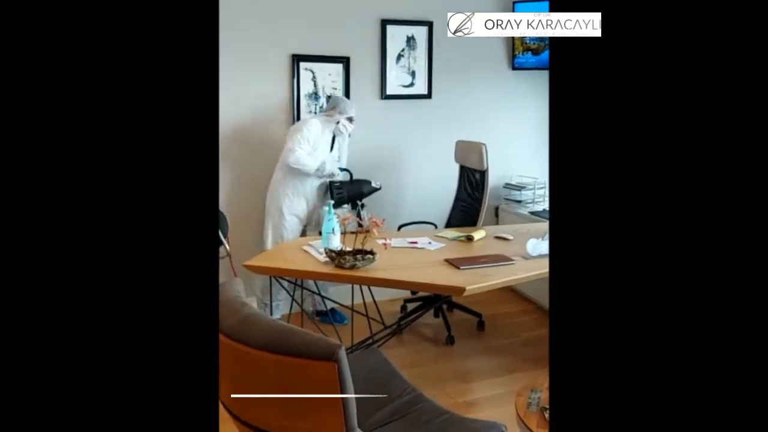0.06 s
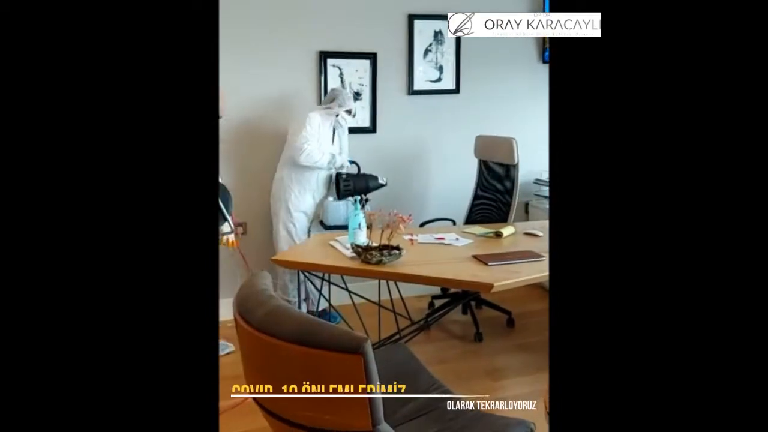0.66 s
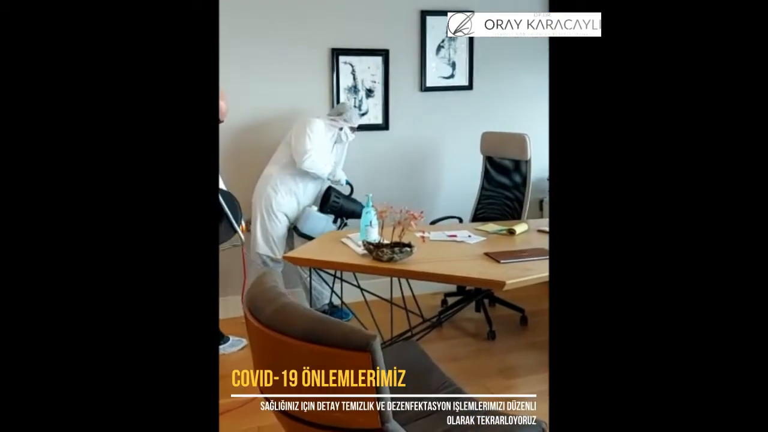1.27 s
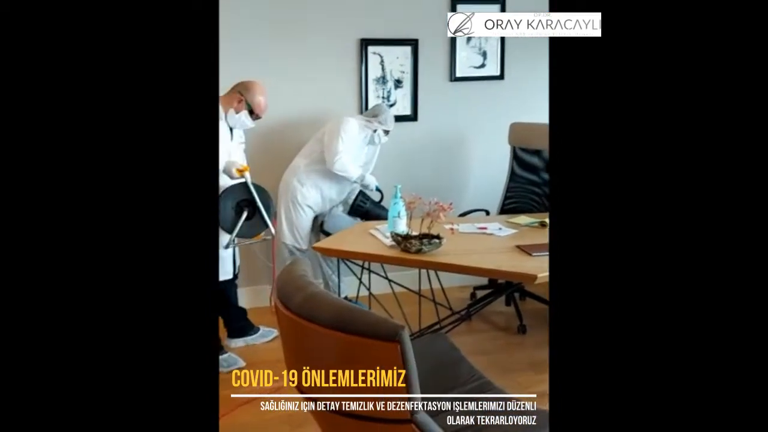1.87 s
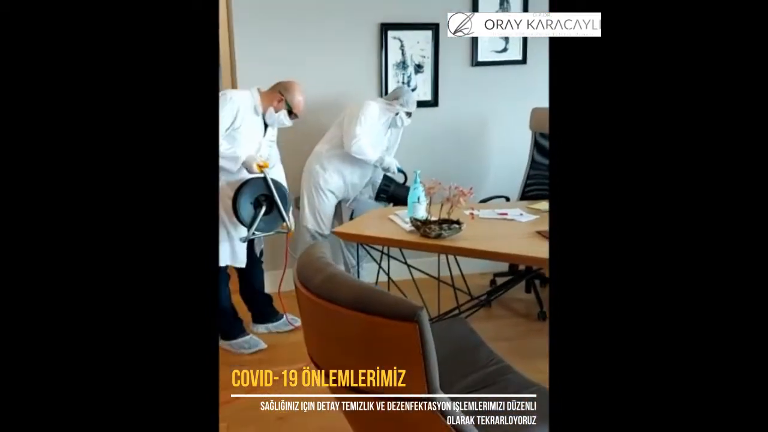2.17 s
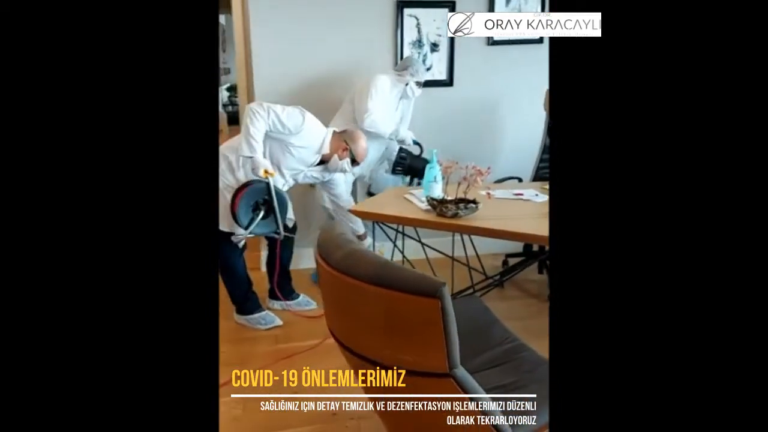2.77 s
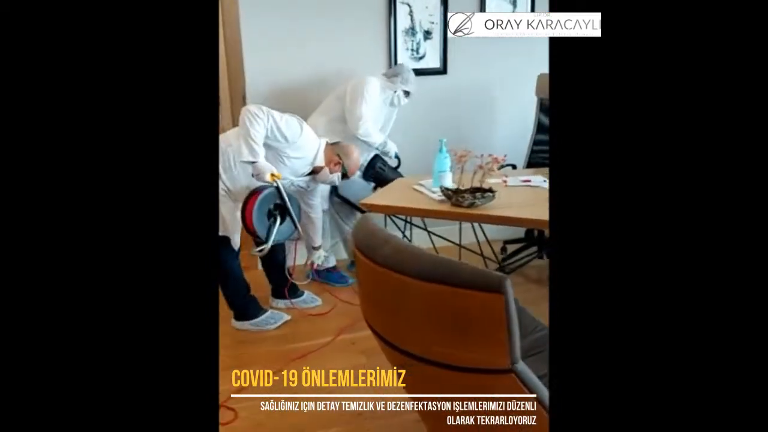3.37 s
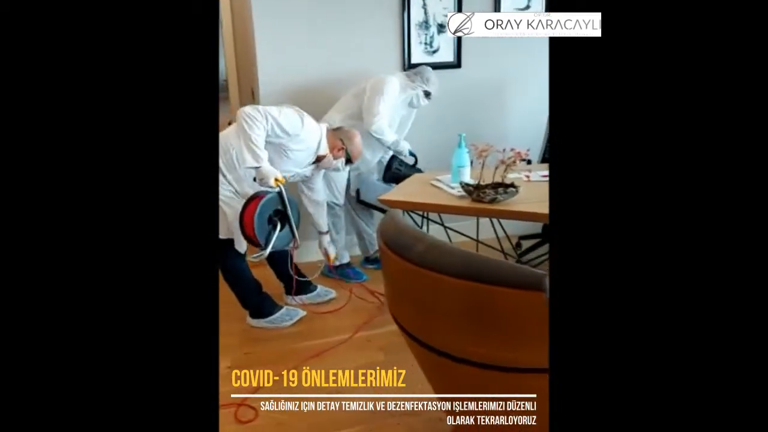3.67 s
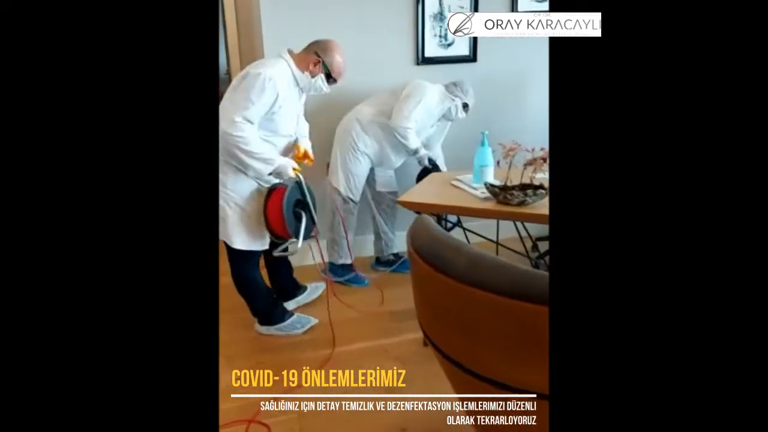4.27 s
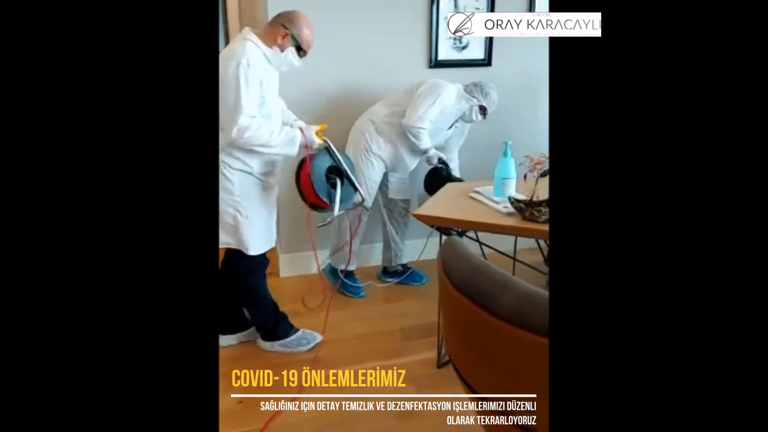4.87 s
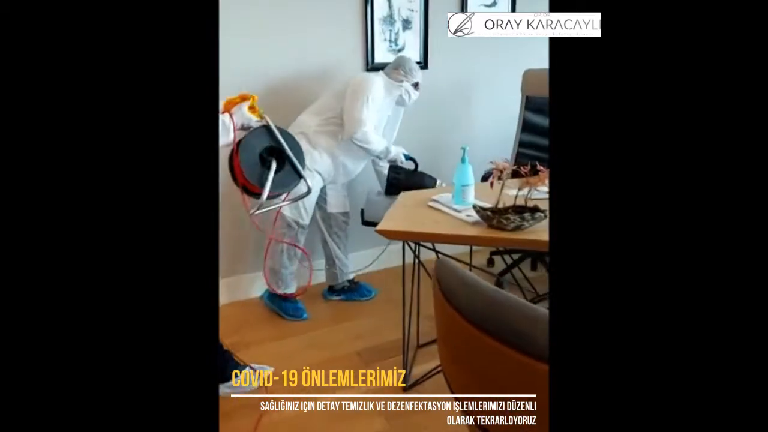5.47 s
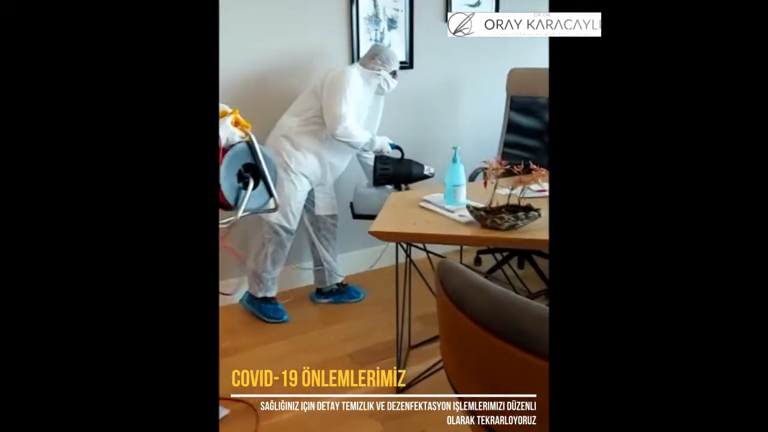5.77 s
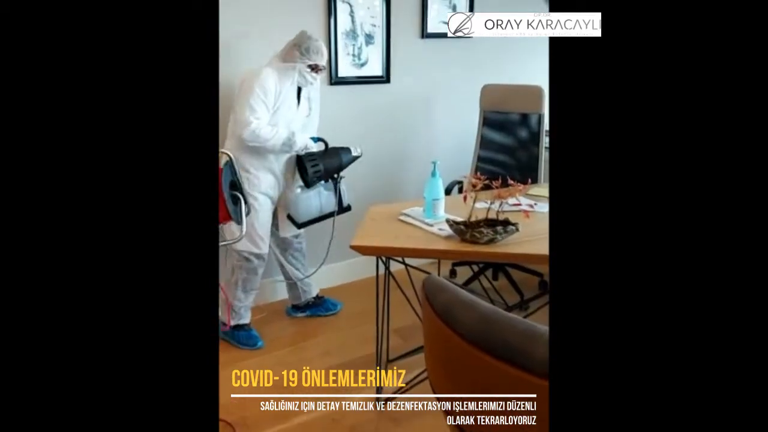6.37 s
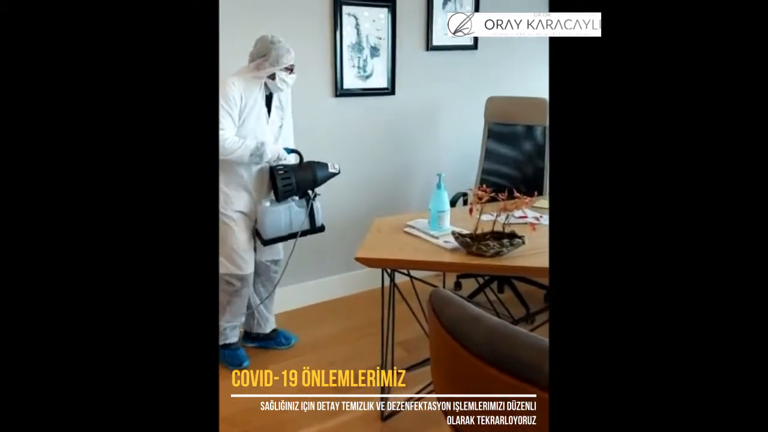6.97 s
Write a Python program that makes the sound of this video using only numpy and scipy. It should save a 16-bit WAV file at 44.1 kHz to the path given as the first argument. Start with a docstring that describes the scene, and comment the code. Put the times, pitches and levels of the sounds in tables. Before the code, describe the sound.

An even jet of air and mist hisses from an electric fogger carried slowly around a small office, heard from a few metres away. Its turbine holds a steady pitch, the hum dipping and shifting between left and right while a high whine flares in brief flashes. Hollow tones rise and fall in the room. The hum thins about halfway through, then fades under a last hollow swell as the spray continues.

```python
"""An electric disinfectant fogger is carried slowly about a small office, a few metres from a phone.
From the start, air jet and mist rush from all sides over a faint low drone, while the turbine hums at
the shaft rate and whines at the blade rate. As the fogger moves, room resonances swell in turn, the hum
dips in the nodes of its standing wave, and the whine flares where reflections add. After three seconds
the hum grows weaker; near seven it fades under a last hollow swell, with the jet still rushing."""
import sys
import numpy as np
from scipy import signal
from scipy.fft import rfft, irfft
from scipy.io import wavfile

SR = 44100
rng = np.random.default_rng(int(sys.argv[2]) if len(sys.argv) > 2 else 0)


def generate_wav(signal):
    """Clip the signal to [-1, 1] and save it as 16-bit WAV at the path in sys.argv[1]."""
    frames = np.transpose(np.atleast_2d(signal))
    scaled = np.clip(frames, -1, 1) * 32767
    pcm = np.round(scaled).astype(np.int16)
    wavfile.write(sys.argv[1], SR, pcm)


N = 310152

# Hollow room resonances that swell as the fogger passes: time_s, half_length_s, centre_hz, width_hz, rms_db
ROOM_SWELLS = [(.1, 0.44, 330, 40, -49.5), (.2, 0.55, 650, 44, -50), (1.84, 0.32, 1040, 60, -44),
               (1.8, 0.7, 910, 50, -48), (3.1, 0.48, 950, 47, -43.5), (3.2, 0.38, 780, 53, -47),
               (2.9, 0.38, 1200, 80, -52), (2.5, .5, 1450, 110, -43), (4.5, 0.43, 1300, 60, -41),
               (5.2, 0.3, 410, 50, -50), (6.85, 0.34, 956, 91, -39), (6.75, 0.36, 385, 50, -50)]
# Noise density of the air, before resonances: frequency_hz, left_db, right_db
AIR_SPECTRUM = [(30, -94.4, -93.1), (65, -93, -95), (140, -77.5, -77), (245, -78.5, -80), (338, -72, -70.5),
                (534, -71, -72.5), (885, -64.5, -65), (2100, -63.5, -61.5), (2860, -65.5, -69),
                (4640, -62, -61.5), (7030, -67, -65), (9160, -68.5, -68), (12500, -63.5, -64),
                (15400, -68.5, -64.5)]
# Resonances of housing and room: centre_hz, width_hz, boost_db
AIR_RESONANCES = [(65.6, 14, 12.5), (145, 18, 0), (207, 41, 4), (296, 28, 4), (367, 28, 1.5), (740, 40, 1),
                  (916, 63, 2), (1670, 180, 0), (3140, 120, 0.5)]
# Drift of the jet, each level taken about its mean: time_s, rush_db, mist_over_rush_db
JET_DRIFT = [(0, .3, .7), (.5, .5, 1.1), (1.4, 0, 0), (3.3, .3, -.3), (4.2, -.3, 0), (5.2, -.5, -.1),
             (6.2, -.3, .3), (7.03, -.7, .4)]
# Turbine speed: time_s, shaft_hz
SHAFT_SPEED = [(0, 576.5), (3, 576.9), (3.6, 577.4), (4.3, 576), (4.7, 575.7), (5, 576.9), (6.1, 577.3),
               (6.5, 578.1), (7.03, 577.1)]
# Shaft tone away from nodes, before panning: time_s, level_db
HUM_LEVEL = [(0, -35.5), (.12, -32), (1, -34.5), (2, -35), (3.13, -35), (3.3, -38), (4.55, -44),
             (4.68, -39), (5.7, -41.5), (6.3, -37.5), (7.03, -49)]
# Nodes of the shaft tone that sweep over the phone: time_s, half_length_s, left_gain_db, right_gain_db
HUM_NODES = [(0.457, 0.3, -1.5, -14), (0.846, 0.27, 1.5, -5), (1.517, 0.37, -12.5, 0),
             (2.136, 0.21, -8, -2), (3.25, 0.048, -7, -6), (3.807, 0.42, -3.5, -16), (4.95, 0.1, 4, -28),
             (5.284, 0.47, -24, 1.5), (6.703, 0.093, -3, -14)]
# Flares of the blade tone as its reflections add up: time_s, half_length_s, left_db, right_db
WHINE_FLARES = [(0.016, 0.027, -33, -35), (.27, 0.027, -35, -28.5), (0.508, 0.035, -29, -41),
                (0.767, 0.028, -34, -31), (1.03, 0.1, -41, -28), (1.273, 0.035, -30, -33),
                (1.714, 0.074, -50, -31), (2.13, 0.037, -37, -33), (2.48, 0.053, -29, -35),
                (2.877, .025, -46, -30), (3.035, 0.032, -38, -30.5), (3.18, 0.018, -29, -47),
                (3.26, 0.018, -29, -24), (3.52, 0.043, -35, -39), (3.8, 0.034, -37, -29),
                (4.072, 0.031, -34, -33), (4.392, 0.07, -42, -30.5), (4.606, 0.033, -43, -24.5),
                (4.75, 0.038, -31, -31), (4.996, .05, -32.5, -37), (5.353, 0.084, -34, -32),
                (5.847, .03, -31, -29), (5.949, 0.04, -35, -26.5), (6.106, .04, -32, -31),
                (6.294, 0.023, -28, -25.5), (6.528, 0.023, -32, -27), (6.687, 0.057, -36, -35),
                (6.95, 0.098, -34.5, -37)]
# Third harmonic of the blade tone, louder as the nozzle points at the phone: time_s, level_db
WHISTLE_LEVEL = [(0, -41), (2.2, -44), (3.6, -38.5), (3.9, -42.5), (5.5, -42.5), (5.7, -36.5),
                 (7.03, -39.5)]
# Swells of the shaft tone's second harmonic: time_s, half_length_s, left_db, right_db
HUM_OCTAVE_SWELLS = [(.72, .07, -55, -38), (3.203, .08, -44, -44), (3.87, .1, -43, -45),
                     (4.497, 0.061, -42, -46), (4.82, .06, -44, -44), (5.3, 0.065, -53, -41)]
# Weak turbine harmonics: shaft_multiple, left_db, right_db
WEAK_HARMONICS = [(2, -49, -49), (3, -54, -54), (18, -53, -57)]

BLADES = 9
PORT_GAP_M, SOUND_SPEED_M_S = .15, 343  # the ports are the phone's two microphone openings
TIME_S = np.arange(N) / SR
BIN_HZ = np.fft.rfftfreq(N, 1 / SR)


def undb(db):
    """Amplitude grows tenfold for every 20 dB."""
    return 10 ** (np.asarray(db) / 20)


def curves(table):
    """Linear interpolation of each column of a table against time."""
    times_s, *columns = np.transpose(table)
    return np.array([np.interp(TIME_S, times_s, column) for column in columns])


def unit(x):
    """Normalisation to rms 1."""
    return x / np.sqrt(np.mean(np.abs(x) ** 2))


def bell(time_s, half_length_s, steepness=2):
    """A Gaussian envelope, 1 at time_s; steepness above 2 gives a plateau with quick edges."""
    return np.exp(-.5 * np.abs((TIME_S - time_s) / half_length_s) ** steepness)


def panned(db, left_over_right_db):
    """A level difference shared equally between the two ports."""
    return undb(db + np.array([[left_over_right_db], [-left_over_right_db]]) / 2)


def wander(rate_hz):
    """Low-passed Gaussian noise: a smooth random fluctuation of rms 1."""
    return unit(irfft(rfft(rng.standard_normal(N)) * np.exp(-.5 * (BIN_HZ / rate_hz) ** 2), N))


def multipath(rate_hz, share):
    """Multipath fading: the complex gain of a steady path plus shifting echoes with a share of the power."""
    return np.sqrt(1 - share) + np.sqrt(share / 2) * (wander(rate_hz) + 1j * wander(rate_hz))


def diffuse_spectra():
    """Diffuse-field coherence: long waves reach both ports alike; short ones and port rumble do not."""
    coherence = 0.87 * np.sinc(2 * BIN_HZ * PORT_GAP_M / SOUND_SPEED_M_S)
    coherence *= BIN_HZ ** 2 / (BIN_HZ ** 2 + 30 ** 2)  # port rumble below 30 Hz
    mid, side = rfft(rng.standard_normal((2, N))) * np.sqrt([(1 + coherence) / 2, (1 - coherence) / 2])
    return np.array([mid + side, mid - side])


def drone(pitch_hz=114, level_db=-64.5):
    """A faint low tone, the same at both ports, wavers by multipath fading."""
    tone = np.exp(2j * np.pi * pitch_hz * TIME_S) * multipath(rate_hz=3.6, share=0.34)
    return undb(level_db) * unit(tone.imag)


def room_swells():
    """Forced resonance: the jet drives a room mode for a moment as it nears an antinode."""
    drive, out = diffuse_spectra(), 0
    for time_s, half_length_s, centre_hz, width_hz, rms_db in ROOM_SWELLS:
        detuning = (BIN_HZ - centre_hz) / (0.61 * width_hz)
        ring = unit(irfft(drive / (1 + detuning ** 2), N))
        out = out + ring * undb(rms_db) * bell(time_s, half_length_s)
    return out


def with_reflections(direct, paths=5, gain=0.17, drift_s=0.000408):
    """Comb filtering: paths via walls and desk vary as the fogger moves, so spectral ripples slide."""
    furniture_band = signal.butter(1, [450, 3000], "band", fs=SR, output="sos")
    bounced = signal.sosfilt(furniture_band, direct)
    bounced = signal.resample_poly(bounced, 2, 1, axis=1)  # half-sample steps keep the sliding smooth
    out = direct
    for delay_s in rng.uniform(0.003014, .025, paths):
        position = np.arange(N) - SR * (delay_s + drift_s * wander(.3))
        out = out + gain * bounced[:, np.round(2 * position).astype(int) % (2 * N)]
    return out


def air_jet():
    """Turbulence and mist make broadband noise, coloured by housing and room; each band flutters."""
    octave = np.log2(np.maximum(BIN_HZ, 1))
    points_hz, *ports_db = np.transpose(AIR_SPECTRUM)
    colour_db = np.array([np.interp(octave, np.log2(points_hz), db) for db in ports_db])
    for centre_hz, width_hz, boost_db in AIR_RESONANCES:
        colour_db += boost_db / (1 + (2 * (BIN_HZ - centre_hz) / width_hz) ** 2)
    spectrum = diffuse_spectra() * undb(colour_db) * np.sqrt(SR / 2)
    rush_db, mist_db = (curve - curve.mean() for curve in curves(JET_DRIFT))
    spray_db = 0.08 * wander(9)  # the liquid feeds the nozzle unevenly
    eddy_db = .4 * wander(1.5)  # large eddies come and go
    out = 0
    for band_octave in np.arange(4, 14.6, .5):
        band = irfft(spectrum * np.maximum(1 - 2 * np.abs(octave - band_octave), 0), N)
        mist_share = np.clip(np.log2(2 ** band_octave / 3000), 0, 1)
        low_share = np.clip(np.log2(800 / 2 ** band_octave), 0, 1)
        flutter_db = 0.45 * wander(16)
        gain_db = rush_db + mist_share * (mist_db + spray_db) + low_share * eddy_db + flutter_db
        out = out + band * undb(gain_db)
    return out


def shaft_hum(shaft_angle, left_lead_rad=0.3):
    """Unbalance sounds once a turn; in a node of its standing wave the tone dips and its phase swings."""
    gain = panned(curves(HUM_LEVEL)[0], left_over_right_db=3)
    gain = gain * np.exp(.5j * left_lead_rad * np.array([[1], [-1]]))
    for time_s, half_length_s, *node_db in HUM_NODES:
        offset = 1j * (TIME_S - time_s) / half_length_s
        gain = gain * (undb(node_db)[:, None] + offset) / (1 + offset)
    return gain * multipath(rate_hz=6, share=0.037) * np.exp(1j * shaft_angle)


def blade_whine(shaft_angle, between_flares_db=-41):
    """The blade-passing tone fades and flares by interference at each port, and flutters in the jet."""
    fading = np.abs([multipath(rate_hz=9, share=0.93) for _ in range(2)])
    gain = panned(between_flares_db, left_over_right_db=-4.5) * fading
    for time_s, half_length_s, *ports_db in WHINE_FLARES:
        flare = bell(time_s, half_length_s, steepness=2.7)
        gain = gain + flare * (undb(ports_db)[:, None] - gain)
    flutter = np.array([np.exp(.5j * wander(4)) * multipath(rate_hz=18, share=.08) for _ in range(2)])
    return gain * flutter * np.exp(1j * BLADES * shaft_angle)


def overtones(shaft_angle):
    """Harmonics lie at whole multiples of the shaft rate; the highest is beamed more to the right port."""
    beam = np.array([undb(db) * multipath(rate_hz=12, share=.6) for db in (-1.5, 1.5)])
    out = undb(curves(WHISTLE_LEVEL)) * np.exp(3j * BLADES * shaft_angle) * beam
    for time_s, half_length_s, *ports_db in HUM_OCTAVE_SWELLS:
        out = out + undb(ports_db)[:, None] * bell(time_s, half_length_s) * np.exp(2j * shaft_angle)
    for multiple, *ports_db in WEAK_HARMONICS:
        fading = np.array([undb(db) * multipath(rate_hz=6.1, share=1) for db in ports_db])
        out = out + fading * np.exp(1j * multiple * shaft_angle)
    return out


def turbine():
    """Rotor harmonics: all tones follow one shaft angle, the integral of a slightly unsteady speed."""
    shaft_hz = curves(SHAFT_SPEED)[0] + 0.18 * wander(12)
    shaft_angle = 2 * np.pi * np.cumsum(shaft_hz) / SR
    tones = shaft_hum(shaft_angle) + blade_whine(shaft_angle) + overtones(shaft_angle)
    return np.sqrt(2) * tones.imag


def scene():
    """Superposition: the pressures from fogger and room add at each port."""
    return with_reflections(air_jet()) + room_swells() + turbine() + drone()


def record(dry):
    """Band limiting: the phone cuts the treble steeply above 15.7 kHz."""
    return signal.sosfilt(signal.ellip(12, .1, 80, 15720, fs=SR, output="sos"), dry)


dry = scene()
out = record(dry)
generate_wav(out)
```